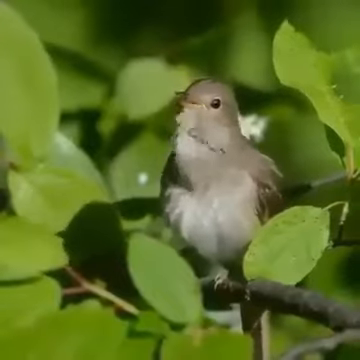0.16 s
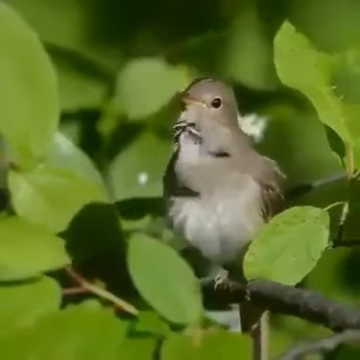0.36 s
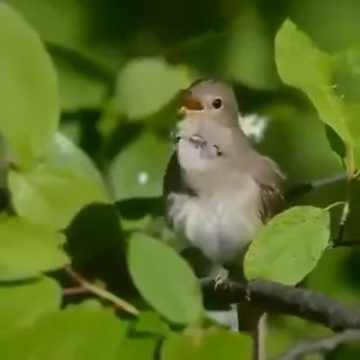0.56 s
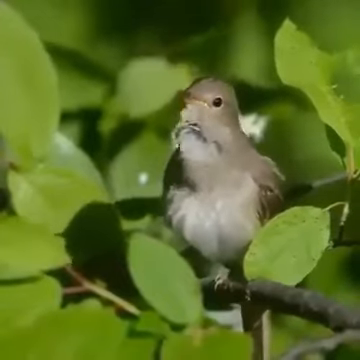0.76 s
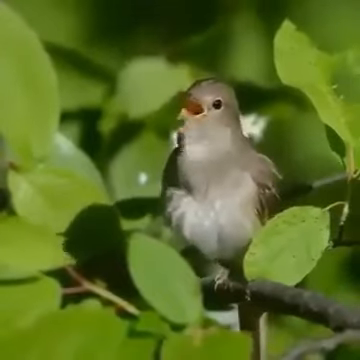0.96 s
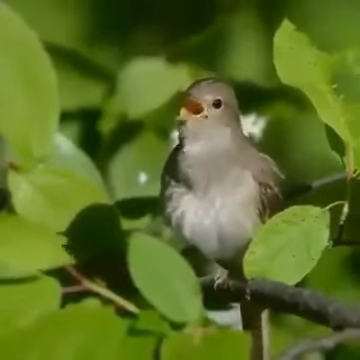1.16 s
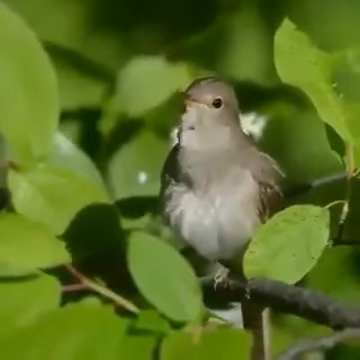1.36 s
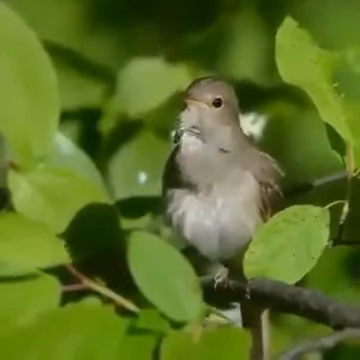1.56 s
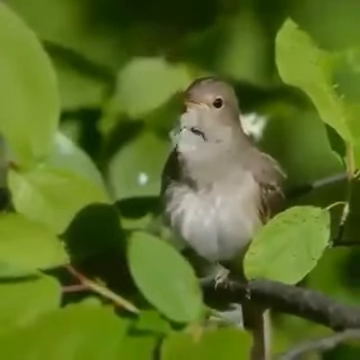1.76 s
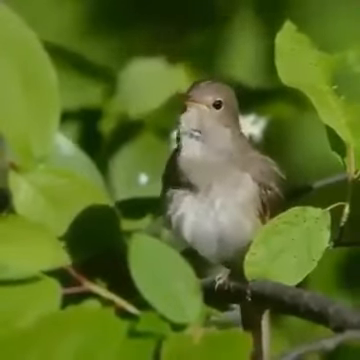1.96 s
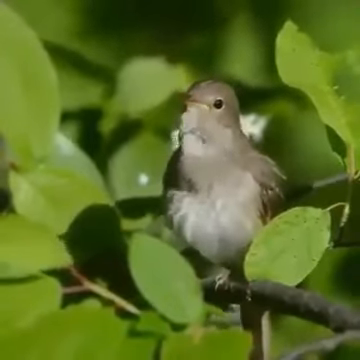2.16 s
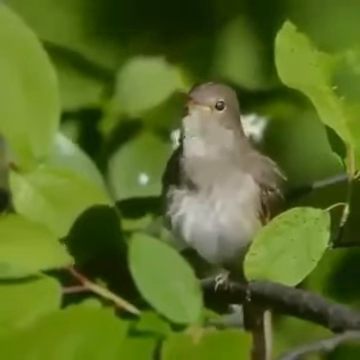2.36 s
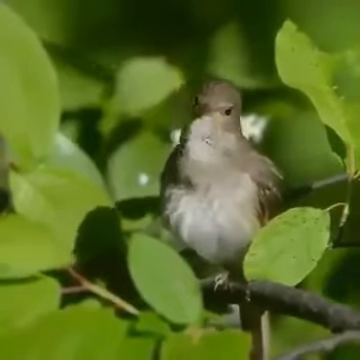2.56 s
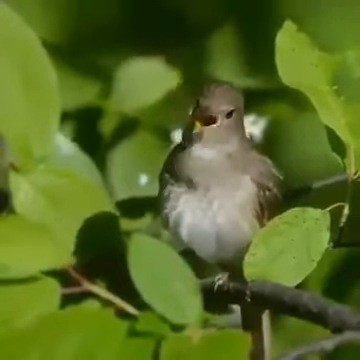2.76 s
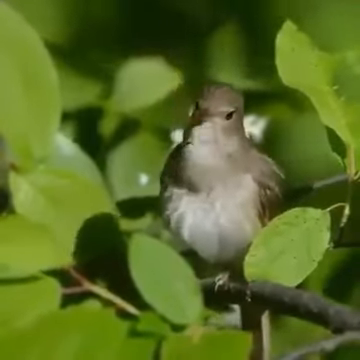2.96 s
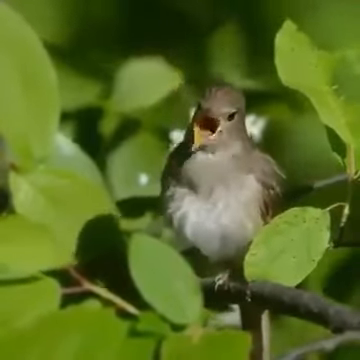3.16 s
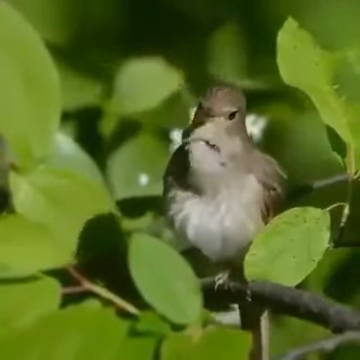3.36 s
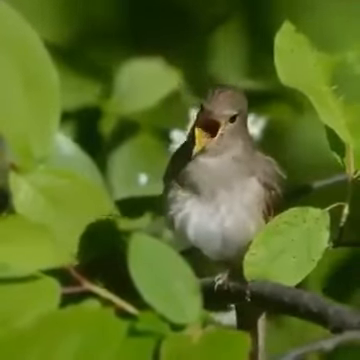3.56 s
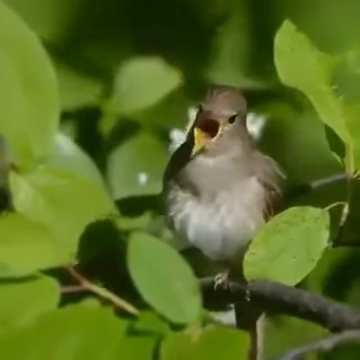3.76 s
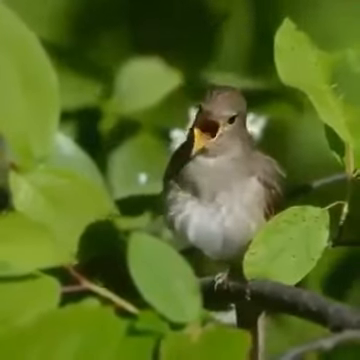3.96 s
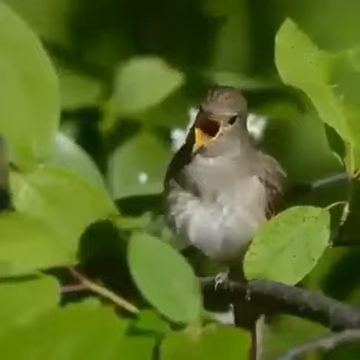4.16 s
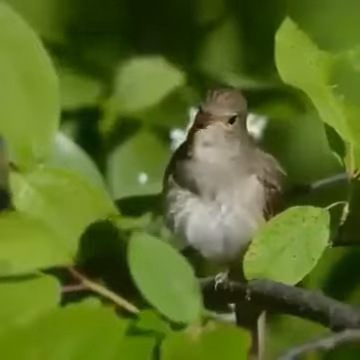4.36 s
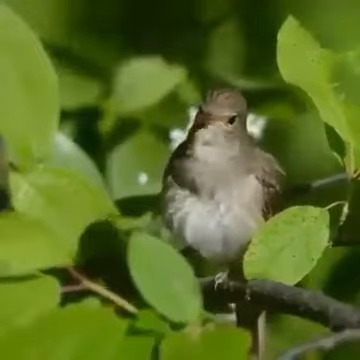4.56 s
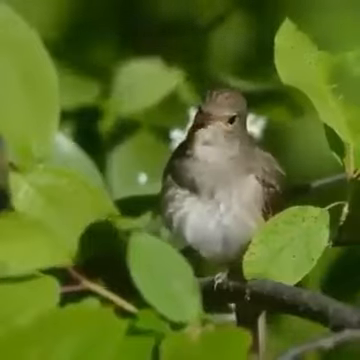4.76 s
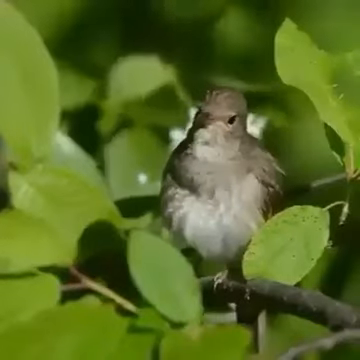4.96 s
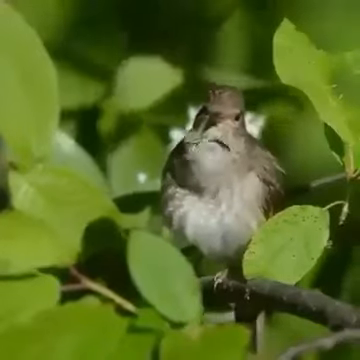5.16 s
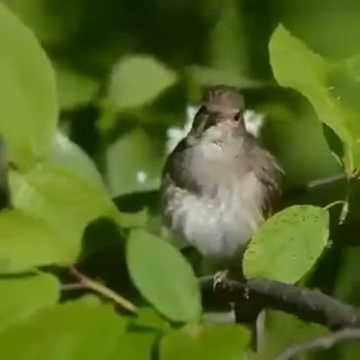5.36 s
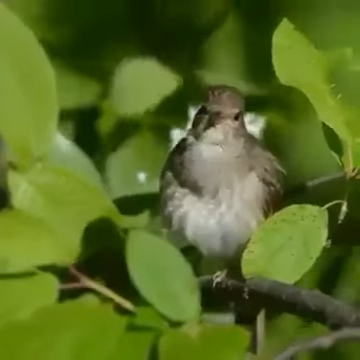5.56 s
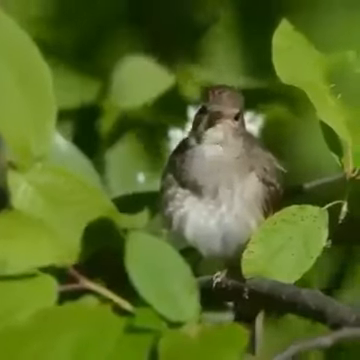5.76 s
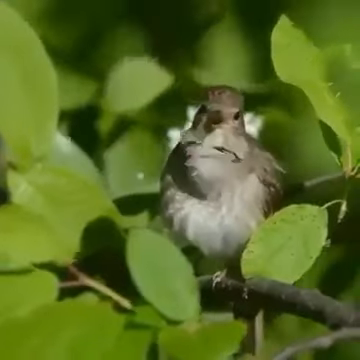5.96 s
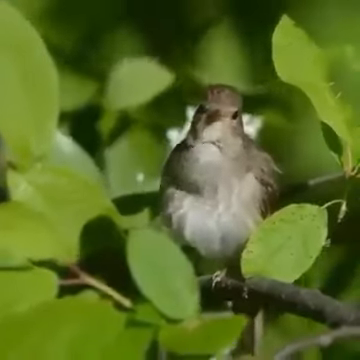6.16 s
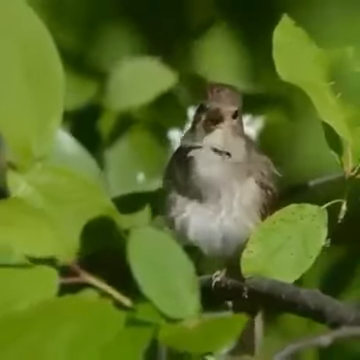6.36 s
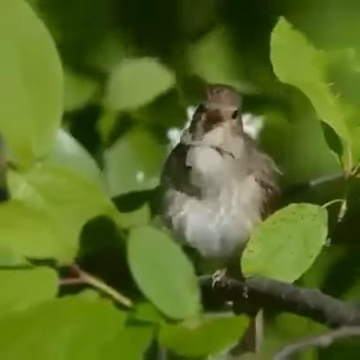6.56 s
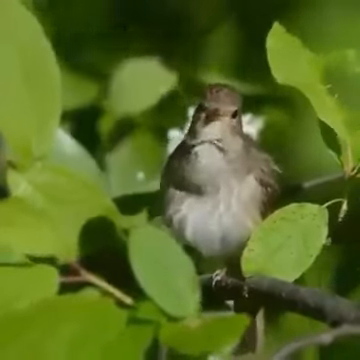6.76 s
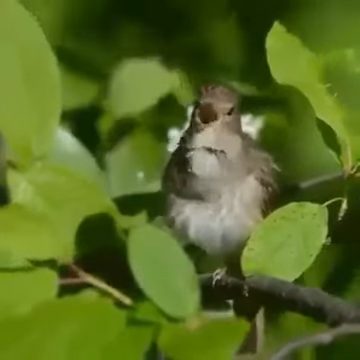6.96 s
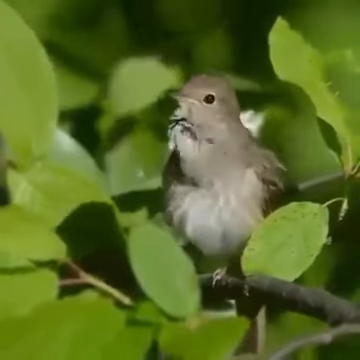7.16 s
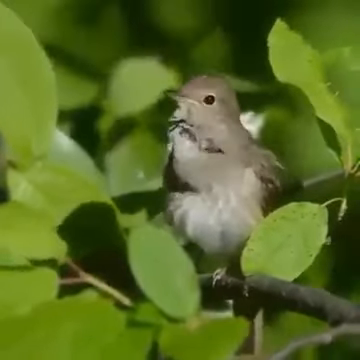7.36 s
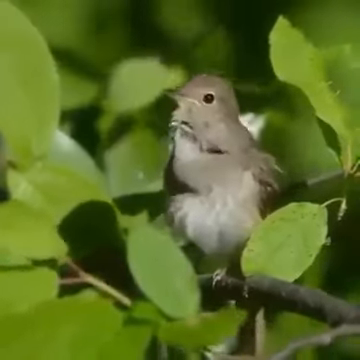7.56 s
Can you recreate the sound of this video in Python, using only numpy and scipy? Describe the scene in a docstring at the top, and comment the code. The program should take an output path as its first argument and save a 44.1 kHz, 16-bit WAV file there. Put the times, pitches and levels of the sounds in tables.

```python
"""In a leafy bush, a nightingale sings close to the microphone: slurred whistles, ticks, harsh rasps, a rattling
trill, then four piping notes and a soft low one. Whistles are near-sine tones on gliding pitch curves,
one gesture for each syllable type; rasps, burrs and ticks are shaped noise mixed with rising squeals.
Echoes and decaying noise tails make leaves and trunks scatter the song. Filtered noise is the faint
outdoor hush, smeared whistles are distant birds, and the loudest peaks flatten as in an overload."""
import sys
import numpy as np
from scipy import signal
from scipy.fft import rfft, irfft, next_fast_len
from scipy.io import wavfile
from scipy.ndimage import map_coordinates

SR = 44100
rng = np.random.default_rng(int(sys.argv[2]) if len(sys.argv) > 2 else 0)


def log_audio(samples):
    """Write samples as a 16-bit WAV file to the path given in sys.argv[1]."""
    # one column per channel
    frames = np.atleast_2d(samples).T
    # limit to full scale, then quantise
    limited = np.clip(frames, -1, 1)
    pcm = np.round(limited * 32767).astype(np.int16)
    wavfile.write(sys.argv[1], SR, pcm)


N = 334719  # length in samples


def amp(db):
    """Decibels to a linear gain."""
    return 10 ** (np.asarray(db) / 20)


def unit(x):
    """Scale to rms 1."""
    return x / np.sqrt(np.mean(x ** 2) + 1e-20)


def along(points, hz):
    """Read a curve of (Hz, value) points on a log frequency axis."""
    f, v = np.transpose(points)
    return np.interp(np.log(hz + 1), np.log(f + 1), v)


def filtered(x, response):
    """Multiply the spectrum of x by a response, a function of frequency in Hz."""
    m = next_fast_len(len(x) + 8192)
    return irfft(rfft(x, m) * response(np.fft.rfftfreq(m, 1 / SR)), m)[:len(x)]


def noise(colour, size):
    """Noise of rms 1 with the given spectral colour."""
    return unit(filtered(rng.standard_normal(size), lambda hz: amp(along(colour, hz))))


def wobble(rate, size):
    """A smooth random curve through rate random knots a second."""
    knots = rng.standard_normal(int(size * rate / SR) + 4)
    return map_coordinates(knots, [np.arange(size) * rate / SR])


def add(track, s, sound):
    """Mix a sound into the track from time s."""
    part = track[max(round(s * SR), 0):][:len(sound)]
    part += sound[:len(part)]


def glide(t, start_hz, end_hz, settle_s):
    """Tension lets go: the pitch relaxes from its start toward a resting value."""
    return end_hz + (start_hz - end_hz) * np.exp(-t / settle_s)


def arch(t, start_hz, top_hz, end_hz, turn_s, rise_s, fall_s):
    """Tension builds ever faster up to a turning point, then lets go."""
    away = np.abs(t - turn_s)
    rising = glide(away, top_hz, start_hz, rise_s)
    falling = glide(away, top_hz, end_hz, fall_s)
    return np.where(t < turn_s, rising, falling)


def envelope(t, attack_s, hold_s, release_s, sag_db=0):
    """Air pressure: a smooth attack, a hold that sags, a smooth release."""
    release = 1 - (t - attack_s - hold_s) / release_s
    opening = np.clip(np.minimum(t / attack_s, release), 0, 1)
    sag = np.clip((t - attack_s) / max(hold_s, 1e-6), 0, 1)
    return np.sin(np.pi / 2 * opening) ** 2 * amp(-sag_db * sag)


def swell(t, rise, fall):
    """A bell-shaped push of air, 20 dB down at -rise and +fall."""
    return amp(-20 * np.abs(t / np.where(t < 0, rise, fall)) ** 2.0)


def nightingale():
    """The whole song: tonal whistles, harsh rasps, burrs and ticks, and toneless rushes of air."""
    return whistles() + rasps() + burrs() + ticks() + croaks() + snap_air()


def whistle(syllable, events, rough, overtone_db, early_s=0):
    """One side of the syrinx: a near-pure tone with a slight flutter, sung once for each row."""
    out = np.zeros(N)
    t = np.arange(SR // 3) / SR - early_s
    for s, db, *shape in events:
        hz, pressure = syllable(t, *shape)
        flutter = 1 + rough * wobble(900, len(t))
        phase = 2 * np.pi * np.cumsum(hz * flutter) / SR
        level = amp(db) * pressure
        harmonics = np.sin(2 * phase) + amp(-15) * np.sin(3 * phase)
        overtones = level * amp(overtone_db) * harmonics  # their share grows with effort
        add(out, s + t[0], level * (np.sin(phase) + overtones))
    return out


def whistles():
    """All the tonal syllables; every slur has its flick and hook, every snap its pipe."""
    pipes = [(s - PIPE_GAP_S - length, PIPE_DB, pitch, length) for s, db, pitch, length in PIPINGS]
    snaps = [(s, db, pitch) for s, db, pitch, length in PIPINGS]
    return (whistle(tut, TUTS, rough=.006, overtone_db=-31.0)
            + whistle(chip, CHIPS, rough=.015, overtone_db=-35)
            + whistle(whoop, WHOOPS, rough=.003, overtone_db=-30)
            + whistle(slur, SLURS, rough=0.032, overtone_db=-30.5)
            + whistle(flick, SLURS, rough=.039, overtone_db=-34.0)
            + whistle(hook, SLURS, rough=.016, overtone_db=-28)
            + whistle(seep, SEEPS, rough=0.0049, overtone_db=-61.0)
            + whistle(lisp, LISPS, rough=.015, overtone_db=-50)
            + whistle(pipe, pipes, rough=.0016, overtone_db=-36, early_s=.02)  # room for the lead-in
            + whistle(snap, snaps, rough=.006, overtone_db=-35)
            + whistle(coo, COOS, rough=0.0045, overtone_db=-7))


# Short low down-slurs. Each row: start in seconds, level in dB, starting pitch in Hz.
TUTS = [(.044, -19, 1490), (.889, -16, 1630), (2.399, -13, 1646), (2.7958, -14, 1670), (3.1344, -20, 1488),
        (3.4959, -19.5, 1490)]


def tut(t, start_hz):
    """A short low drop. Like every syllable, it gives (pitch Hz, amplitude)."""
    hz = glide(t, start_hz, end_hz=650, settle_s=.0095)
    return hz, envelope(t, attack_s=0.0018, hold_s=0.0096, release_s=0.0017, sag_db=8)


# Loud steep down-slurs. Each row: start in seconds, level in dB.
CHIPS = [(0.0685, -3.5), (3.1605, -1), (3.522, -0.5)]


def chip(t):
    """A steep drop that fades as it falls."""
    hz = glide(t, start_hz=3043, end_hz=747, settle_s=0.0078)
    return hz, envelope(t, attack_s=0.0037, hold_s=0.015, release_s=.005, sag_db=24.5)


# Mellow climbing whistles. Each row: start in seconds, level in dB, pitch ratio, swell time in seconds.
WHOOPS = [(.412, -7.5, 0.97, 0.04), (1.505, -11.5, 1.055, 0.043), (1.903, -7.5, .995, 0.038)]


def whoop(t, pitch, swell_s):
    """Swells as it climbs, then drops to a soft level tail."""
    hz = pitch * arch(t, start_hz=1440, top_hz=1970, end_hz=1135, turn_s=.043, rise_s=.022, fall_s=.0095)
    tail = amp(-16.5) * envelope(t, attack_s=.01, hold_s=.098, release_s=.008, sag_db=1.5)
    return hz, envelope(t, swell_s, hold_s=0.01, release_s=0.014) + tail


# Plunging slurs, which also cue the flick, the hook and a tick. Each row: start in seconds, level in dB.
SLURS = [(0.6214, -3.5), (2.134, -3), (2.528, -1.5)]


def slur(t):
    """Leaps up, then plunges at full force and levels out more softly."""
    hz = arch(t, start_hz=3065, top_hz=4910, end_hz=2016, turn_s=0.014, rise_s=0.016, fall_s=0.0091)
    trough = amp(-10.0) * envelope(t - .024, attack_s=0.014, hold_s=0.021, release_s=0.0068)
    return hz, envelope(t, attack_s=0.015, hold_s=0.0051, release_s=0.019, sag_db=1.5) + trough


def flick(t):
    """The second side of the syrinx shoots upward over the start of a slur."""
    hz = glide(t, start_hz=2570, end_hz=11110, settle_s=0.017)
    return hz, envelope(t, attack_s=0.0039, hold_s=0.0014, release_s=0.0033, sag_db=8)


def hook(t):
    """After a slur the voice returns, lifts a little and tumbles."""
    t = t - .065  # seconds after the slur starts
    hz = arch(t, start_hz=2180, top_hz=2500, end_hz=500, turn_s=.02, rise_s=0.021, fall_s=.014)
    return hz, amp(-7.0) * envelope(t, attack_s=0.0084, hold_s=0.02, release_s=0.0017, sag_db=4.5)


# Thin upturned whistles. Each row: start in seconds, level in dB, starting pitch in Hz,
# length of the pitch curve in seconds, steady climb as a share of the pitch.
SEEPS = [(1.232, -6, 6710, 0.045, 0.0085), (4.367, -5.5, 6610, 0.0292, 0.049),
         (5.745, -13, 6125, 0.056, .08)]


def seep(t, hz, length_s, climb):
    """A thin swelling whistle that turns upward as it ends."""
    u = np.clip(t / length_s, 0, 1)
    rising_hz = hz * (1 + climb * u + 0.14 * u ** 7)
    return rising_hz, envelope(t, 0.63 * length_s, .27 * length_s, 0.22 * length_s)


# Faint falling lisp. Each row: start in seconds, level in dB.
LISPS = [(5.626, -38.5)]


def lisp(t):
    """A faint high slide downward."""
    hz = glide(t, start_hz=8600, end_hz=6400, settle_s=0.029)
    return hz, envelope(t, attack_s=0.034, hold_s=.003, release_s=0.01)


# Piping notes, each closed by a snap. Each row: start of the snap in seconds, snap level in dB,
# pitch ratio, length of the pipe in seconds.
PIPINGS = [(6.1511, -8, 1.04, 0.054), (6.462, -7.5, 1.01, 0.057), (6.769, -6.5, .997, 0.059),
           (7.0847, -4.5, 0.99, 0.063)]
PIPE_DB, PIPE_GAP_S = -4.3, .023  # level of every pipe; silence from its end to the snap


def pipe(t, pitch, length_s):
    """A full, pure note that creeps in and sinks slightly."""
    attack_s, release_s, lead_s = .028, .011, .018
    hz = pitch * arch(t, start_hz=2350, top_hz=2406, end_hz=2248, turn_s=0.014, rise_s=0.023, fall_s=0.03)
    return hz, envelope(t, attack_s, length_s - attack_s - release_s, release_s) + lead_in(t, lead_s)


def lead_in(t, length_s):
    """The voice sounds faintly before the main push of air, which comes at t = 0."""
    return amp(-26.5) * envelope(t + length_s, length_s, length_s / 2, length_s / 2)


def snap(t, pitch):
    """Whips down to just under the pipe's pitch and lingers there softly."""
    hz = pitch * glide(t, start_hz=3603, end_hz=2182, settle_s=0.0062)
    tail = amp(-10) * envelope(t - .012, attack_s=.006, hold_s=0.026, release_s=0.011, sag_db=1)
    return hz, envelope(t, attack_s=0.0027, hold_s=.012, release_s=0.0045) + tail


# Soft low note. Each row: start in seconds, level in dB.
COOS = [(7.268, -25)]


def coo(t):
    """A long soft note, gently arched."""
    hz = 1163 * (1 - 2.2 * (t - .085) ** 2)
    return hz, envelope(t, attack_s=0.034, hold_s=0.185, release_s=0.023, sag_db=-1.0)


def squeals(size, rate, low_hz, high_hz, rough, octave_db):
    """The membranes lock briefly into tones that shoot upward, over a weaker tone an octave below."""
    speed = rate * amp(3.7 * wobble(rate, size))  # squeals a second, unsteady
    cycle = (rng.random() + np.cumsum(speed) / SR) % 1
    hz = (low_hz + (high_hz - low_hz) * cycle) * (1 + rough * wobble(1200, size))
    phase = 2 * np.pi * np.cumsum(hz) / SR
    tone = np.sin(phase) + amp(octave_db) * np.sin(phase / 2)
    return unit(np.sin(np.pi * cycle) * tone)


def harsh(events, colour, tonal, rate, low_hz, high_hz, rough, octave_db):
    """Chaotic vibration of the syrinx: noise shaped by the throat, shot through with rising squeals."""
    out = np.zeros(N)
    for s, db, rise, fall in events:
        t = np.arange(-2 * rise, 2 * fall, 1 / SR)
        breath = np.sqrt(1 - tonal) * noise(colour, len(t))
        tones = np.sqrt(tonal) * squeals(len(t), rate, low_hz, high_hz, rough, octave_db)
        add(out, s + t[0], amp(db) * swell(t, rise, fall) * (breath + tones))
    return out


def puffs(events, colour):
    """Swells of toneless noise, as from a rush of air."""
    out = np.zeros(N)
    for s, db, rise, fall in events:
        t = np.arange(-2 * rise, 2 * fall, 1 / SR)
        add(out, s + t[0], amp(db) * swell(t, rise, fall) * noise(colour, len(t)))
    return out


# Long rasps. Each row: peak in seconds, level in dB.
RASPS = [(0.244, -9.5), (1.054, -8.5), (2.96, -7.5), (3.329, -7.5)]
# Colours of the rasp's noise and of its puff of air. Each row: frequency in Hz, relative density in dB.
RASP_COLOUR = [(290, -50), (500, -25), (1220, -23.5), (1430, -21), (2160, -20), (2430, -14), (2690, -28),
               (3280, -11.5), (3740, -9.5), (6550, -4), (7340, -4.5), (8240, -23.5), (9930, -12),
               (10800, -31), (15500, -45.5)]
PUFF_COLOUR = [(20, -1.5), (100, 0.5), (350, 0.5), (700, -11.5), (1500, -49.5)]
RASP_RISE_S, RASP_FALL_S = 0.047, .04  # both over 20 dB
PUFF_DB, PUFF_LAG_S, PUFF_S = -30, .004, 0.033  # level and lag relative to the rasp, half length


def rasps():
    """Long harsh syllables streaked with squeals, each with a low puff of air near its peak."""
    voice = [(s, db, RASP_RISE_S, RASP_FALL_S) for s, db in RASPS]
    air = [(s + PUFF_LAG_S, db + PUFF_DB, PUFF_S, PUFF_S) for s, db in RASPS]
    rasp = harsh(voice, RASP_COLOUR, tonal=.45, rate=42, low_hz=4750, high_hz=7750, rough=.011, octave_db=-11)
    return rasp + puffs(air, PUFF_COLOUR)


# Rattles, each a burr and slowing ticks. Each row: first tick in seconds, burr level in dB, tick level in dB.
RATTLES = [(3.6597, -11.5, -11.5), (3.833, -11, -11), (4.0079, -11, -12), (4.1837, -10.5, -12.5)]
# Colour of the burr's noise. Each row: frequency in Hz, relative density in dB.
BURR_COLOUR = [(100, -30.5), (400, -28), (1010, -24.5), (1530, -16.5), (2020, -11), (2300, -20.5),
               (2940, -7), (3510, -2.5), (4730, -10), (8320, -29.5), (9940, -24), (14000, -55)]
BURR_LEAD_S, BURR_RISE_S, BURR_FALL_S = .02, 0.018, .018  # peak ahead of the first tick; rise, fall over 20 dB


def burrs():
    """The gruff stroke that opens each rattle, noise mixed with rapid squeals."""
    strokes = [(s - BURR_LEAD_S, db, BURR_RISE_S, BURR_FALL_S) for s, db, tick_db in RATTLES]
    return harsh(strokes, BURR_COLOUR, tonal=0.43, rate=120, low_hz=3000, high_hz=3800,
                 rough=0.098, octave_db=-37)


# Single ticks. Each row: peak in seconds, level in dB.
TICKS = [(.8635, -6), (1.236, -26), (1.7795, -12), (2.3735, -6.5), (2.7715, -6)]
# Colour of the tick's noise. Each row: frequency in Hz, relative density in dB.
TICK_COLOUR = [(470, -61), (800, -27.5), (1730, -27), (2380, -15), (3320, -6.5), (4910, -7), (5160, -1),
               (6440, -4), (7280, -2.5), (8330, -25), (10300, -13.5), (10900, -31.5), (15000, -49.5)]
TICK_RISE_S, TICK_FALL_S = 0.0027, 0.0064  # both over 20 dB
TICK_GAP_S, GAP_GROWS_S = .03, .0021  # first gap in a rattle; each later one is this much longer
SLUR_TICK_DB, SLUR_TICK_S = -2.5, 0.008  # the tick that opens each slur: relative level, lag


def ticks(count=4):
    """Very short harsh strokes: single ones, the slowing run in each rattle, and one opening each slur."""
    strokes = list(TICKS)
    for s, burr_db, db in RATTLES:
        for k in range(count):
            delay = k * TICK_GAP_S + k * (k - 1) / 2 * GAP_GROWS_S
            strokes.append((s + delay, db))
    strokes += [(s + SLUR_TICK_S, db + SLUR_TICK_DB) for s, db in SLURS]
    events = [(s, db, TICK_RISE_S, TICK_FALL_S) for s, db in strokes]
    return harsh(events, TICK_COLOUR, tonal=.35, rate=150, low_hz=4826, high_hz=7326,
                 rough=0.035, octave_db=-15)


# A croak inside the second slur. Each row: peak in seconds, level in dB, rise in seconds, fall in seconds.
CROAKS = [(2.181, -23, .018, .016)]
# Colour of the croak. Each row: frequency in Hz, relative density in dB.
CROAK_COLOUR = [(100, -11.5), (300, -16.5), (550, -3.5), (1000, -2.5), (1500, -1.5), (2200, -15),
                (3500, -41.5)]


def croaks():
    """A brief low swell of toneless noise."""
    return puffs(CROAKS, CROAK_COLOUR)


# Colour of the air in the snaps. Each row: frequency in Hz, relative density in dB.
SNAP_AIR_COLOUR = [(100, -13), (600, -6.5), (2000, 4.5), (7500, 2), (8500, -20.5), (11000, -24),
                   (13000, -50)]
SNAP_AIR_DB, SNAP_AIR_RISE_S, SNAP_AIR_FALL_S = -29.5, .005, .03  # relative to the snap; rise, fall over 20 dB


def snap_air():
    """A faint rush of air in each snap, a quick swell of noise that dies more slowly."""
    air = [(s + SNAP_AIR_RISE_S, db + SNAP_AIR_DB, SNAP_AIR_RISE_S, SNAP_AIR_FALL_S)
           for s, db, pitch, length in PIPINGS]
    return puffs(air, SNAP_AIR_COLOUR)


# Base decay of the grove, scaled at each use. Each row: frequency in Hz, time to fall 60 dB in seconds.
GROVE_T60 = [(300, 1), (1200, 0.37), (2300, 0.64), (5000, 0.5), (7500, 0.54), (12000, 0.14)]


def scatter(x, t60_scale):
    """Diffuse answer of the grove: a noise tail in which each frequency dies at its own speed."""
    hz, t, z = signal.stft(rng.standard_normal(SR), SR, nperseg=256)
    t60 = t60_scale * along(GROVE_T60, hz)[:, None]
    tail = signal.istft(z * amp(-60 * t / t60), SR, nperseg=256)[1]
    return signal.fftconvolve(x, tail / np.linalg.norm(tail))[:N]


# Nearby branches and ground. Each row: delay in seconds, level in dB relative to the direct sound.
ECHOES = [(.0034, -20), (.0075, -16.5), (.019, -19), (.034, -32)]
BUSH_DB, BUSH_T60_SHARE = -16, .26  # level of the bush scatter; its share of the grove's base decay


def grove(x, trees_db):
    """Direct sound, a few near reflections, a quick scatter from the bush and a longer one from the trees."""
    def reflections(hz):
        return 1 + sum(amp(db) * np.exp(-2j * np.pi * hz * s) for s, db in ECHOES)

    near = filtered(x, reflections)
    bush = amp(BUSH_DB) * scatter(x, BUSH_T60_SHARE)
    return near + bush + amp(trees_db) * scatter(x, 0.92)


# Distant birds. Each row: start in seconds, level in dB before scatter and the shared gain,
# pitch in Hz at 0.07 s into the call.
FAR_CALLS = [(4.619, -44.5, 3280), (5.02, -45, 3860), (5.089, -52, 4310), (7.27, -44, 3320)]


def distant_birds(far_db):
    """Whistles of distant birds, heard only through a diffuse scatter."""
    calls = whistle(far_call, FAR_CALLS, rough=0.014, overtone_db=-30)
    return amp(far_db) * scatter(calls, 0.47)


def far_call(t, hz):
    """A slow swelling whistle that drifts upward."""
    return hz * (1 + 0.456 * (t - .07)), envelope(t, attack_s=0.05, hold_s=0.0077, release_s=.07)


# Colour of the outdoor hush. Each row: frequency in Hz, relative density in dB.
HUSH = [(15, -39), (25, -11), (110, -4), (301, -7), (335, -7.5), (554, -3), (802, -9.5), (966, -6),
        (1190, -11), (1800, -12), (2200, -1), (2500, -8.5), (3830, -11), (5120, -13.5), (9410, -22),
        (10800, -26), (12000, -61), (14000, -61)]
HUSH_DRIFT_DB = .8  # scale of the slow random level drift


def hush(hush_db):
    """Faint air in the foliage: coloured noise whose level drifts slowly."""
    return amp(hush_db + HUSH_DRIFT_DB * wobble(3.01, N)) * noise(HUSH, N)


def scene():
    """The bird in its grove over the outdoor background."""
    song = grove(nightingale(), trees_db=-18)
    return (song + hush(hush_db=-46.0) + distant_birds(far_db=1.5))[None]


TOP_HZ = 15700  # band limit


def record(dry):
    """Overload flattens peaks near full scale, then a very steep low-pass cuts above the band limit."""
    clipped = dry[0] / (1 + np.abs(dry[0]) ** 20) ** (1 / 20)
    return filtered(clipped, lambda hz: 1 / (1 + (hz / TOP_HZ) ** 100))[None]


dry = scene()
out = record(dry)
log_audio(out)
```